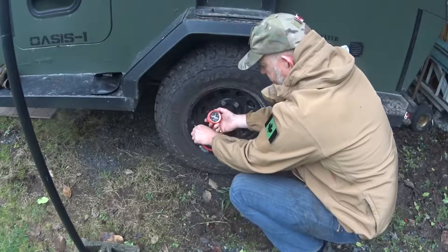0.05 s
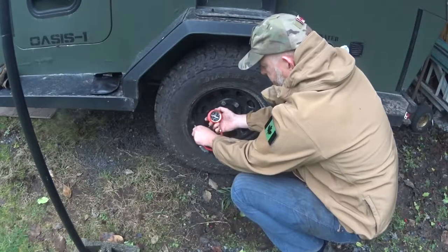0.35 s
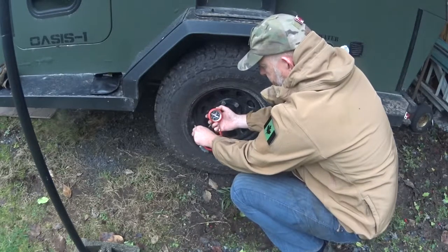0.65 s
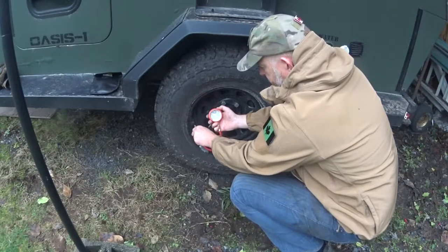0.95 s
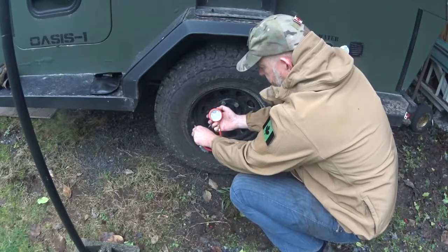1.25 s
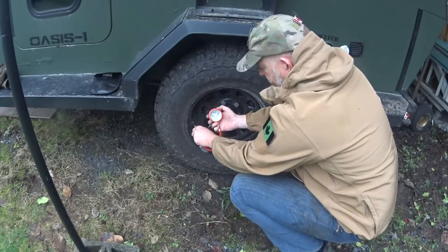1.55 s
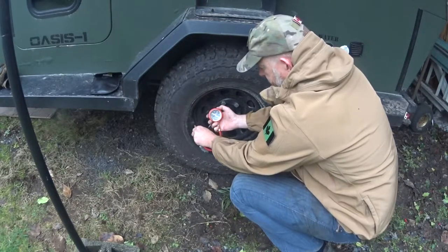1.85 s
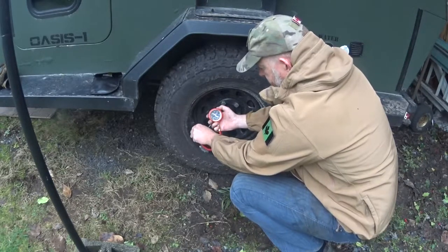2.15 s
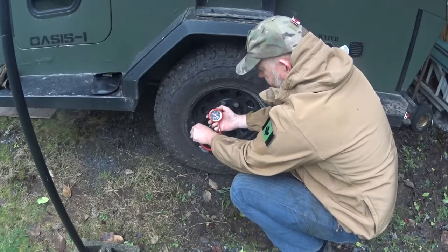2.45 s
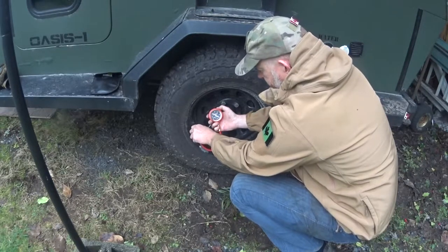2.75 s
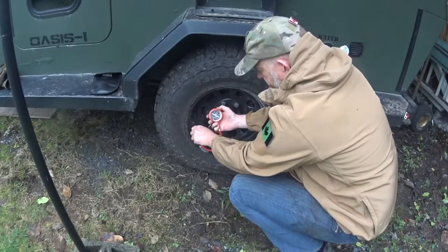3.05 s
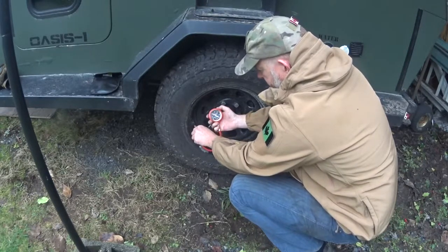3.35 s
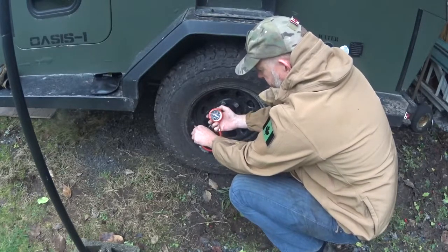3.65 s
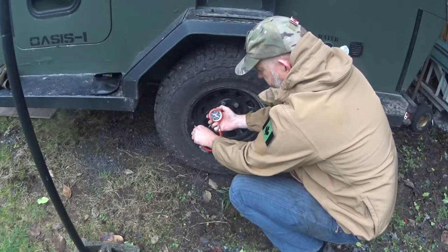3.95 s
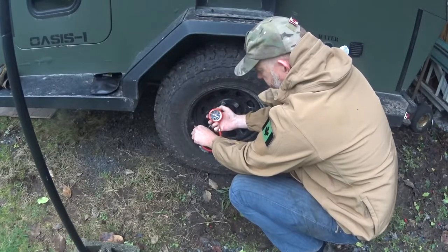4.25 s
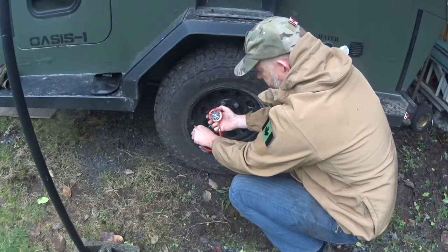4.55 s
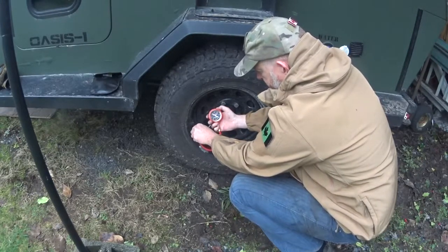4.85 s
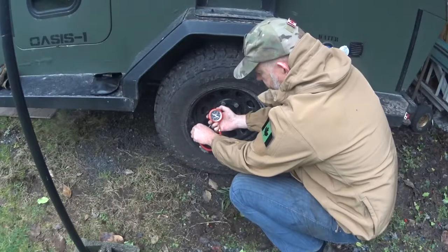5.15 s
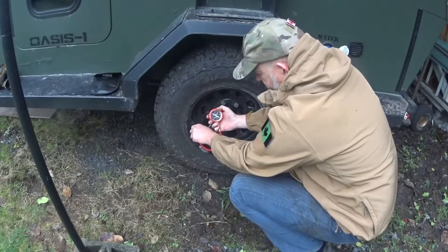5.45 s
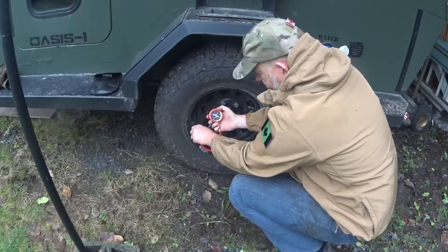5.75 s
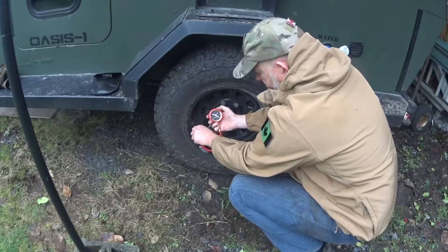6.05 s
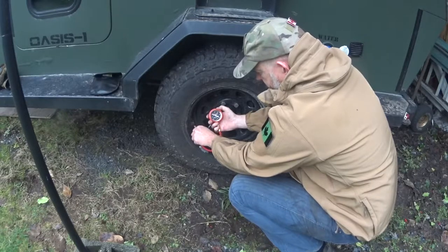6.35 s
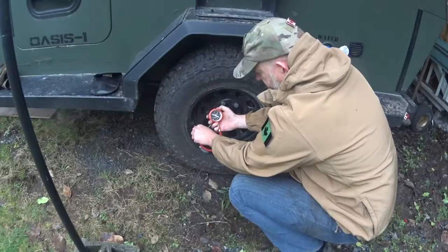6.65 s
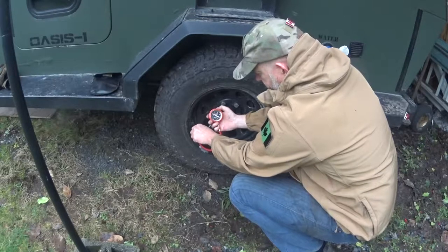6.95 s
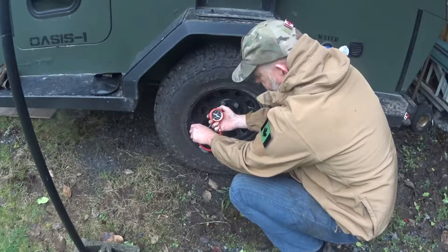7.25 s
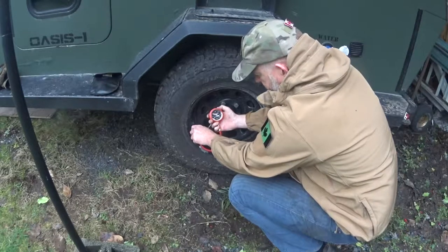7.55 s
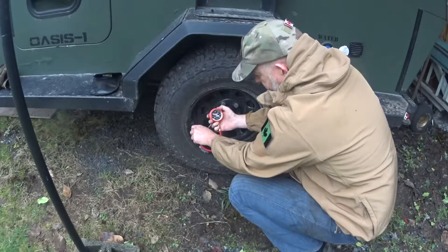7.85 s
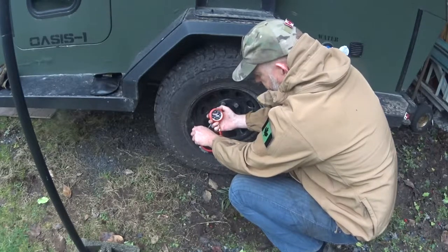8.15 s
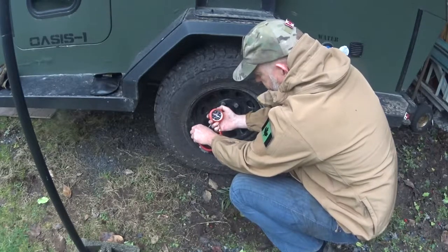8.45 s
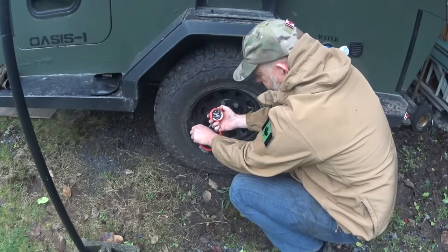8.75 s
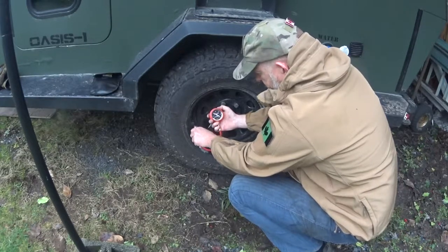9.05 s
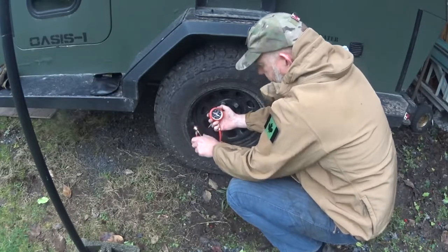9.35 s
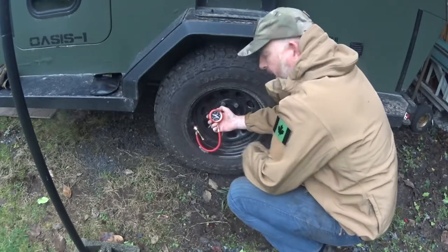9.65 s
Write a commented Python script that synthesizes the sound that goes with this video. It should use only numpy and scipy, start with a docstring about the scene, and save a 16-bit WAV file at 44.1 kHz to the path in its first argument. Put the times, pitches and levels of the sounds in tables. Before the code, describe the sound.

A tyre is let down outdoors in four loud, steady hisses, followed by the soft slide of a jacket sleeve.

```python
"""Letting down a tyre

Outdoors, air escapes in four blasts through a deflator on the valve. The turbulent jet hisses loudly,
coloured by resonances of nozzle, hand and wheel, and drives a limiter down. In the pauses come far
traffic, a faint siren, a brief hum and two thin bird calls; at the end a jacket sleeve slides."""
import sys
import numpy as np
from scipy import signal
from scipy.fft import rfft, irfft, next_fast_len
from scipy.io import wavfile
from scipy.ndimage import uniform_filter1d

SR = 44100
rng = np.random.default_rng(int(sys.argv[2]) if len(sys.argv) > 2 else 0)


def store_wav(level_fs):
    """Save 16-bit WAV to argv[1]."""
    pcm = np.round(np.clip(np.atleast_2d(level_fs), -1, 1) * 32767)
    wavfile.write(sys.argv[1], SR, pcm.T.astype(np.int16))


N = 436574
T = np.arange(N) / SR
SIZE = next_fast_len(N + SR, real=True)
HZ = np.maximum(np.arange(SIZE // 2 + 1) * SR / SIZE, 1)

# scatter from vehicle, ground and yard: (frequency [Hz], level re direct sound [dB], decay time T60 [s])
YARD_SCATTER = [(400, -7, 0.15), (1995, -8.5, 0.26), (4400, -5.5, 0.24), (5940, -25, 0.47),
                (10510, -16, 0.23)]


def from_db(db):
    """Amplitude ratio of a level in decibels."""
    return 10 ** (np.asarray(db) / 20)


def unit_rms(x):
    """Normalisation to unit power."""
    return x / np.sqrt(np.mean(x ** 2) + 1e-20)


def at_hz(rows, hz=HZ):
    """Interpolation of each column over log frequency."""
    points, *columns = np.transpose(rows)
    return [np.interp(np.log(hz), np.log(points), c) for c in columns]


def white():
    """Spectrum of fresh white noise."""
    return rfft(rng.standard_normal(SIZE))


def wave(spectrum):
    """Inverse Fourier transform, cut to the scene's length."""
    return irfft(spectrum, SIZE)[..., :N]


def drift(corner_hz, step=40, settle=2000):
    """Random modulation of rms 1: noise through a two-pole low-pass."""
    pole = np.exp(-2 * np.pi * corner_hz * step / SR)
    noise = rng.standard_normal(N // step + settle + 2)
    slow = signal.lfilter([1], [1, -2 * pole, pole * pole], noise)[settle:]
    return np.interp(np.arange(N) / step, np.arange(len(slow)), unit_rms(slow))


def tone(hz):
    """Sine of rms 1 whose phase is the integral of frequency."""
    return np.sqrt(2) * np.sin(2 * np.pi * np.cumsum(hz) / SR)


def stereo_noise(rows):
    """Coloured noise of rms 1; the balance of mid and side sets the left-right correlation."""
    level_db, correlation = at_hz(rows)
    correlation = np.clip(correlation, -1, 1)
    mid = np.sqrt(1 + correlation) * white()
    side = np.sqrt(1 - correlation) * white() * [[1], [-1]]
    return unit_rms(wave(from_db(level_db) * (mid + side)))


def passband(cutoff_hz=11040, edge_hz=35):
    """Gain of a steep low-pass filter."""
    return (1 - np.tanh((HZ - cutoff_hz) / edge_hz)) / 2


def jet(open_s=.0032, shut_s=.0053, widen_s=.043, narrow_s=.037,
        drive_db=8, flutter_db=1.13, broad_loss_db=10, beam_loss_db=4, beam_above_hz=7500):
    """Turbulent mixing noise, coloured by cavity resonances and gated by the deflator's sliding collar."""
    # jet noise: (frequency [Hz], relative spectral level [dB])
    spectrum = [(100, -57), (250, -42), (380, -32.8), (600, -26.3), (900, -21.5), (1400, -19.7),
                (2400, -18.9), (3300, -16), (4300, -16.6), (5800, -11.4), (7200, -13.7), (8500, -8),
                (9500, -4.1), (11000, -.3)]
    # resonances of nozzle, hand and wheel: (frequency [Hz], bandwidth [Hz], lift [dB])
    cavities = [(1738, 90, 4.2), (2067, 70, 2.3), (2868, 180, 3.8), (4707, 205, 6.1), (5413, 290, 6.3),
                (6297, 385, 5.3), (7726, 85, 3.1), (8914, 170, 4.2), (9635, 65, 2.9), (9983, 160, 5.3),
                (10326, 600, 2.9)]
    # valve openings, before drive_db: (start [s], end [s], broad level [dB], sag [dB/s], beam level [dB])
    blasts = [(-.2, 2.156, -16, -0.16, -8.5), (2.716, 4.808, -16.2, .45, -8.5),
              (5.484, 6.704, -16.2, .6, -8.5), (7.358, 8.315, -15.7, -0.3, -8)]
    resonance_db = sum(db / (1 + (2 * (HZ - hz) / width) ** 2) for hz, width, db in cavities)
    turbulence = white() * from_db(at_hz(spectrum)[0] + resonance_db) * passband()
    # the top of the hiss leaves as a narrow beam, the rest spreads all round
    beamed = 1 / (1 + (beam_above_hz / HZ) ** 16)
    broad = unit_rms(wave(turbulence * (1 - beamed)))
    beam = unit_rms(wave(turbulence * beamed))
    air = 0
    for start, end, broad_db, sag_db_per_s, beam_db in blasts:
        opening = (1 + np.tanh((T - start) / (2 * open_s))) / 2
        closing = (1 - np.tanh((T - end) / (2 * shut_s))) / 2
        # while the collar travels the slit is narrow: less air, and a thinner hiss
        pinched = 1 - np.clip(np.minimum((T - start) / widen_s, (end - T) / narrow_s), 0, 1)
        broad_gain = from_db(broad_db - sag_db_per_s * (T - start) - broad_loss_db * pinched)
        beam_gain = from_db(beam_db - beam_loss_db * pinched)
        air = air + opening * closing * (broad_gain * broad + beam_gain * beam)
    return from_db(drive_db + flutter_db * drift(25)) * air


def hand_echo(air, delay_s=.0014, sway_s=.00009, sway_hz=.3, reflection=.1):
    """Comb filtering: a weak echo off the swaying hand slowly shifts the colour of the hiss."""
    delay = delay_s + sway_s * drift(sway_hz)
    return air + reflection * np.interp(T - delay, T, air)


def deflator(scatter):
    """Interference: the jet reflects in the wheel's dish, then arrives directly and by way of the yard."""
    # early reflections in the wheel: (delay [s], signed amplitude [ratio])
    bounces = [(.00186, .055), (.00278, -.055), (.003875, .04)]
    # the jet at two microphone ports: (frequency [Hz], left minus right [dB], left phase lead [rad])
    ports = [(150, 0, 0), (350, 3, .6), (560, -12, 2.6), (800, -5, 1.4), (1800, -1, 1.15), (3200, -.5, .6),
             (4700, -.9, .5), (5400, -.5, .06), (11000, -.25, .1)]
    wheel = 1 + sum(share * np.exp(-2j * np.pi * HZ * delay) for delay, share in bounces)
    balance_db, lead = at_hz(ports)
    sides = np.array([[.5], [-.5]])
    direct = from_db(sides * balance_db) * np.exp(1j * sides * lead)
    direct = direct / np.sqrt(np.mean(abs(direct) ** 2, axis=0))
    # direct and diffuse sound add in power
    total_gain = np.sqrt(1 + from_db(at_hz(YARD_SCATTER)[0]) ** 2)
    hiss = rfft(hand_echo(jet()), SIZE)
    return wave(hiss * wheel * (direct + scatter) / total_gain)


def yard(build_s=.006):
    """Diffuse scattering as a stereo frequency response: each band of noise decays exponentially."""
    t = T[:SR // 2]
    edges_hz = np.geomspace(200, 12800, 13)
    noise = rng.standard_normal((2, 2, len(t)))
    tail = 0
    for k, (low, high) in enumerate(zip(edges_hz, edges_hz[1:])):
        level_db, t60 = at_hz(YARD_SCATTER, np.sqrt(low * high))
        fade = from_db(-60 * t / t60) * (1 - np.exp(-t / build_s))
        bandpass = signal.butter(2, [low, high], "band", fs=SR, output="sos")
        band = signal.sosfilt(bandpass, noise[k % 2])  # adjacent bands are uncorrelated
        tail = tail + from_db(level_db) * band * fade / np.linalg.norm(fade)
    return rfft(tail, SIZE)


def sleeve(peak_s=9.33, peak_db=-38.5, swell_db_per_s=69, ease_db_per_s=7, uneven_db=.8):
    """Friction noise of cloth on cloth: one stroke swells to its fastest moment, then eases off."""
    # rubbing cloth: (frequency [Hz], relative spectral level [dB], left-right correlation [-1..1])
    cloth = [(200, -9, .3), (700, 3, 0.092), (2000, -3, 0.13), (3500, -3.5, 0.21), (5200, -1, 0.66),
             (7500, -5, 0.7), (11000, -6.5, 0.85)]
    since = T - peak_s
    stroke_db = peak_db + np.minimum(swell_db_per_s * since, -ease_db_per_s * since)
    return from_db(stroke_db + uneven_db * drift(18)) * stereo_noise(cloth)


def birds(scatter, wet_db=18):
    """Frequency modulation makes thin whistles flutter; they are heard mostly as scatter from the yard."""
    # notes: (start [s], length [s], first pitch [Hz], last pitch [Hz], direct level [dB], flutter [Hz])
    chirps = [(5.19, .035, 6740, 6600, -49.5, 59.8), (5.212, 0.1, 6730, 6530, -50.5, 230),
              (5.296, 0.047, 5940, 5800, -52.5, 149), (5.315, 0.029, 4720, 4520, -55, 400),
              (5.352, .02, 3420, 3450, -64, 100.7), (8.735, .04, 7540, 7650, -56, 25)]
    calls, flutter = np.zeros(N), drift(201)
    for start, length, from_hz, to_hz, level_db, flutter_hz in chirps:
        now = (T >= start) & (T < start + length)
        along = (T[now] - start) / length
        pitch = from_hz + (to_hz - from_hz) * along + flutter_hz * flutter[now]
        calls[now] += from_db(level_db) * np.sin(np.pi * along) * tone(pitch)
    return wave(rfft(calls, SIZE) * (1 + from_db(wet_db) * scatter))


def traffic(road_db=-48, rumble_db=-51.2, rumble_db_per_s=.35, hum_db=-60, hum_db_per_s=1.05,
            hum_hz=118, waver_hz=1.2, flicker_db=1.5, octave_db=-14):
    """Superposition of steady far tyre noise and an engine whose rumble and exhaust hum grow as it nears."""
    # engine and tyre noise: (frequency [Hz], relative spectral level [dB], left-right correlation [-1..1])
    engine_spectrum = [(20, -31.5, 0.93), (44.8, -5.5, 0.68), (75, -4, 1), (100.4, 0.5, 0.83),
                       (147, -7.5, 1), (247, -10.5, 0.97), (497, -34, 1)]
    road_spectrum = [(60, -10.5, .9), (150, -8.5, .85), (280, 4.5, 0.35), (480, -1.5, -0.52),
                     (850, 1.5, 0.19), (1153, -2, -0.18), (1602, -6, -0.75), (2580, -14, -0.39),
                     (5500, -21, 0.74), (11000, -20.5, .6)]
    pitch = hum_hz + waver_hz * drift(4.84)
    fundamental = from_db(flicker_db * drift(3)) * tone(pitch)
    octave = from_db(octave_db + 2 * drift(2)) * tone(2 * pitch)
    exhaust = from_db(hum_db + hum_db_per_s * T) * (fundamental + octave)
    rumble = from_db(rumble_db + rumble_db_per_s * T) * stereo_noise(engine_spectrum)
    return rumble + exhaust + from_db(road_db) * stereo_noise(road_spectrum)


def far_hum(start_s=2.1, length_s=.5, hz=241, waver_hz=4, level_db=-55):
    """Amplitude envelope of half a sine: a far low note swells and fades once."""
    swell = np.sin(np.pi * np.clip((T - start_s) / length_s, 0, 1))
    return from_db(level_db) * swell * tone(hz + waver_hz * drift(10))


def siren(rise_at_s=4.5, period_s=5.62, low_hz=720, top_hz=1550, wind_up_s=1.22, coast_s=4.6,
          level_db=-58, horn_hz=980, horn_width_hz=620):
    """Multipath fading: a far wail, loudest near its horn's resonance, wavers differently on each side."""
    age = (T - rise_at_s) % period_s
    winding_hz = top_hz - (top_hz - low_hz) * np.exp(-age / wind_up_s)
    coasting_hz = low_hz * np.exp((period_s - age) / coast_s)
    hz = np.minimum(winding_hz, coasting_hz)
    horn = 1 / (1 + (2 * (hz - horn_hz) / horn_width_hz) ** 4)
    phase = 2 * np.pi * np.cumsum(hz) / SR
    paths = np.array([drift(10) * np.sin(phase) + drift(10) * np.cos(phase) for side in range(2)])
    return from_db(level_db) * horn * paths


def scene():
    """Superposition of the deflator close by and the outdoors around it."""
    scatter = yard()
    return deflator(scatter) + traffic() + siren() + birds(scatter) + sleeve() + far_hum()


def record(dry, limit_db=-11.5, slope=.92, release_db_per_s=100, ceiling=.95):
    """Limiting holds the jet down and lets the background swell back; peaks clip and the top is cut."""
    power = uniform_filter1d(np.mean(dry ** 2, axis=0), size=700)
    level_db = 10 * np.log10(np.maximum(power, 1e-12))
    reduction_db = slope * np.maximum(level_db - limit_db, 0)
    # the gain falls at once and recovers at the release rate
    held_db = np.maximum.accumulate(reduction_db + release_db_per_s * T) - release_db_per_s * T
    gain = from_db(-uniform_filter1d(held_db, size=300))
    limited = np.clip(dry * gain, -ceiling, ceiling)
    return wave(rfft(limited, SIZE) * passband())


dry = scene()
out = record(dry)
store_wav(out)
```